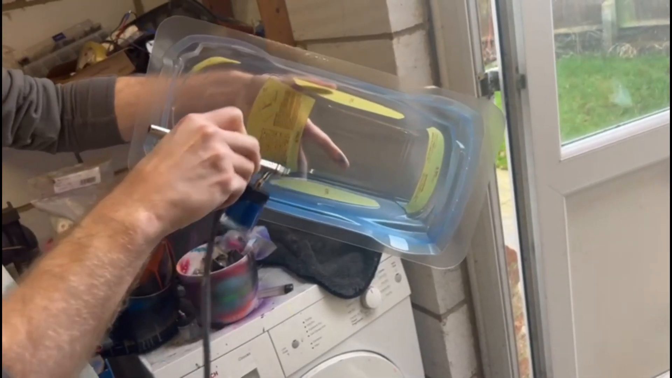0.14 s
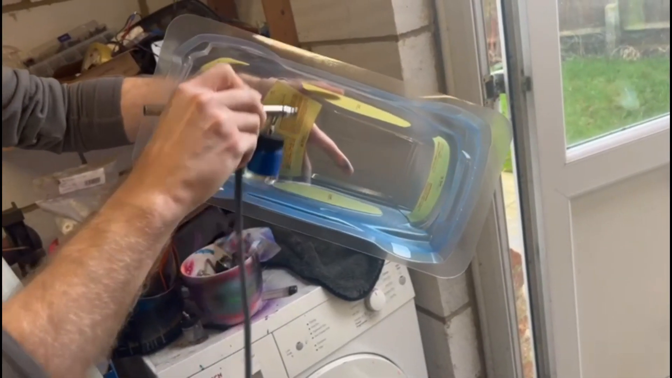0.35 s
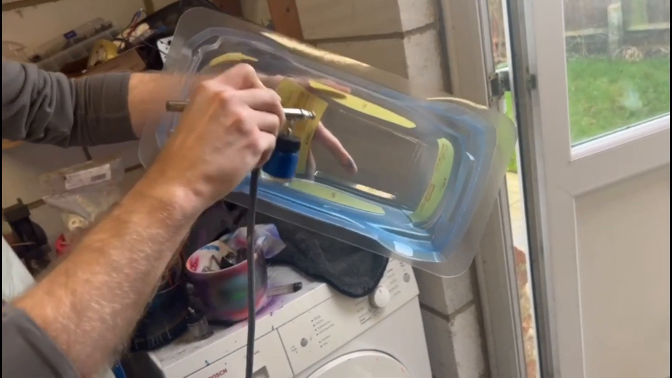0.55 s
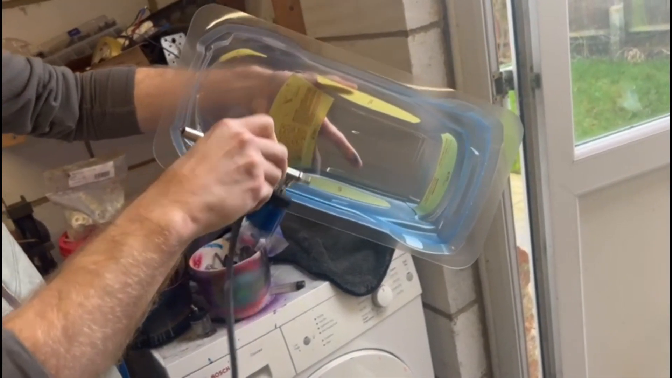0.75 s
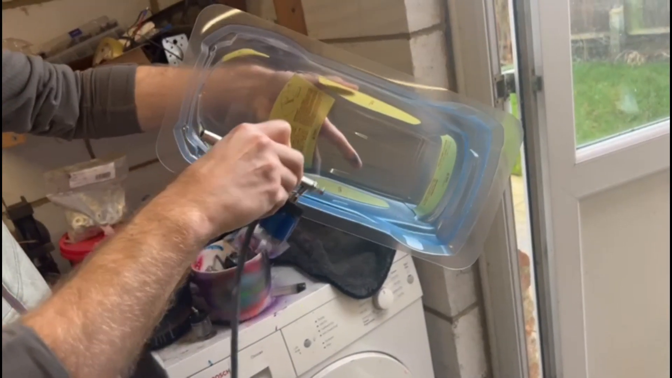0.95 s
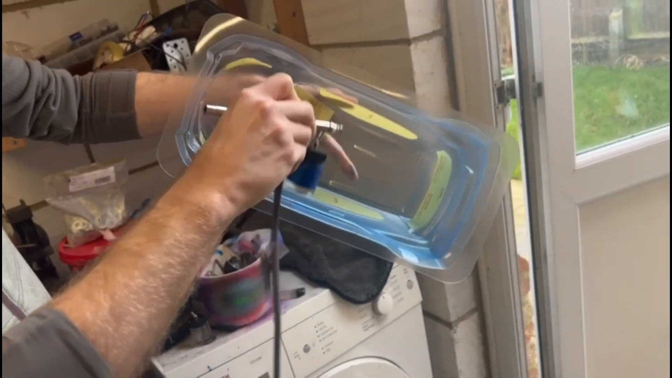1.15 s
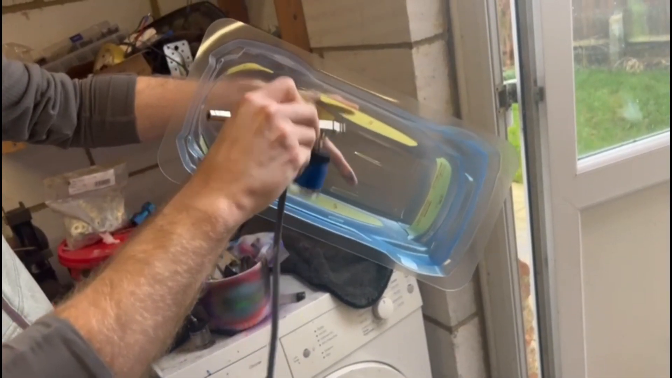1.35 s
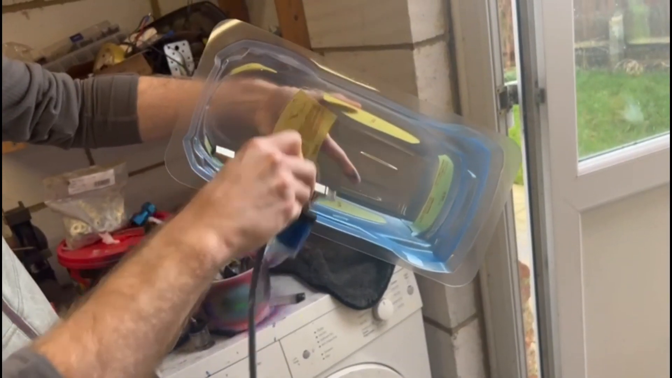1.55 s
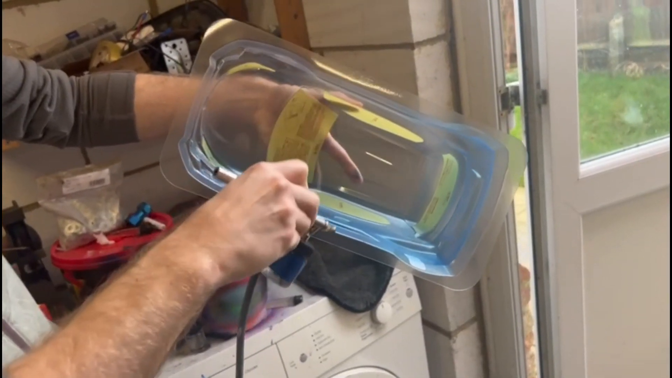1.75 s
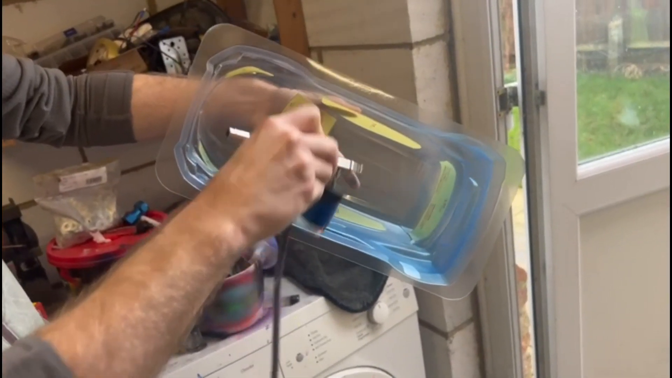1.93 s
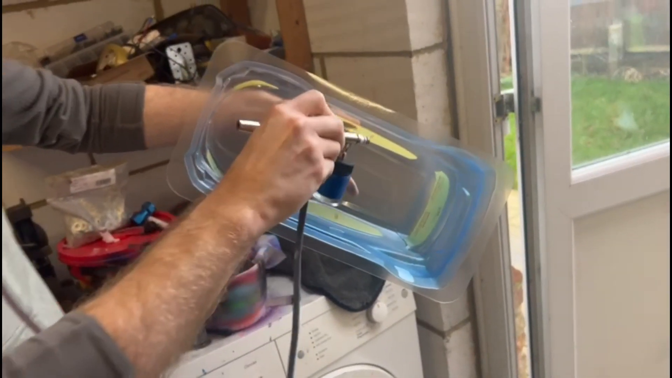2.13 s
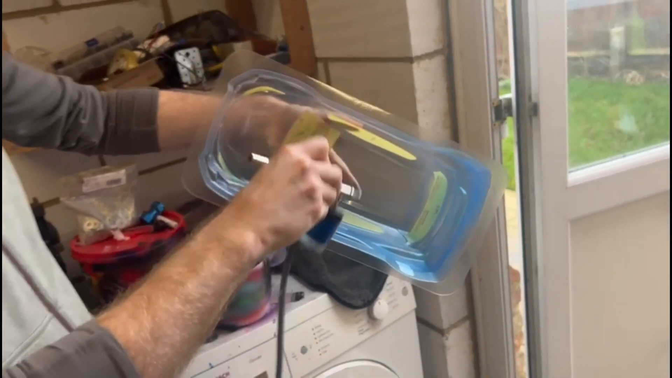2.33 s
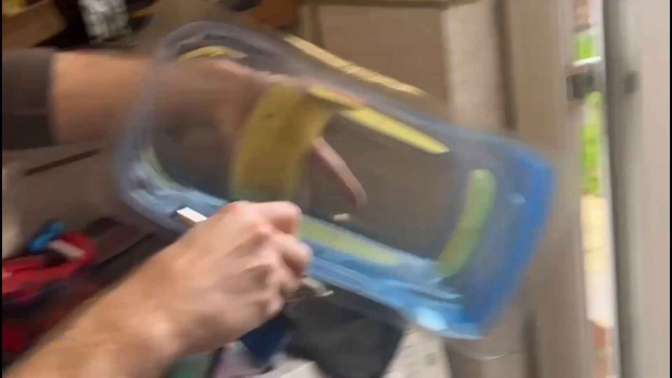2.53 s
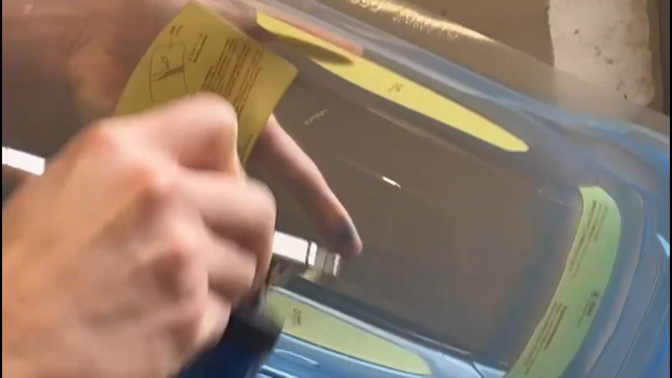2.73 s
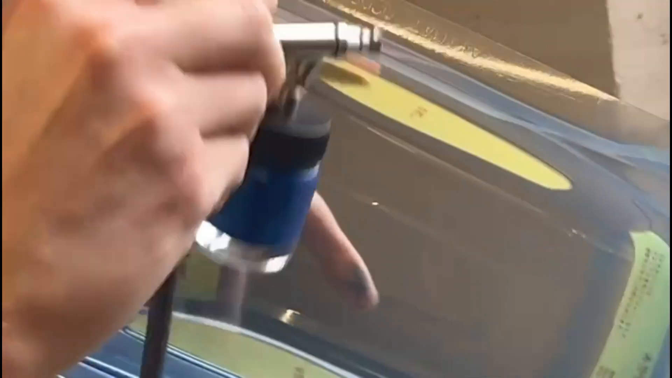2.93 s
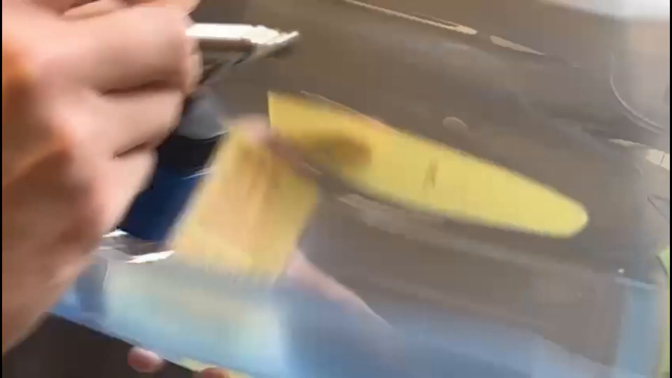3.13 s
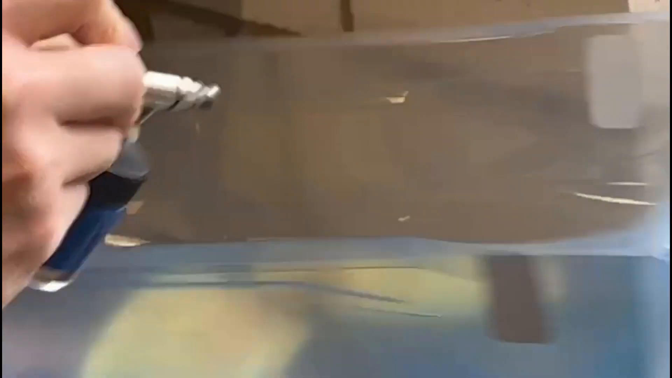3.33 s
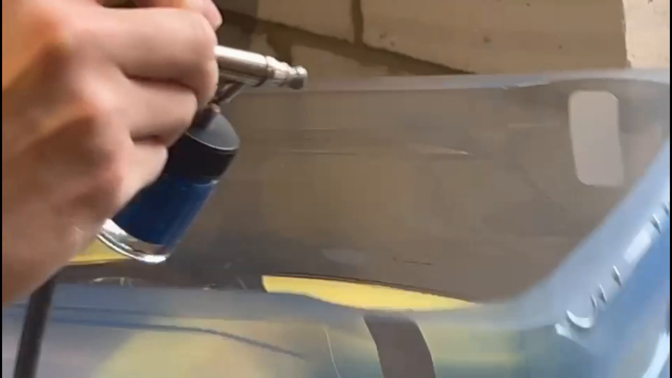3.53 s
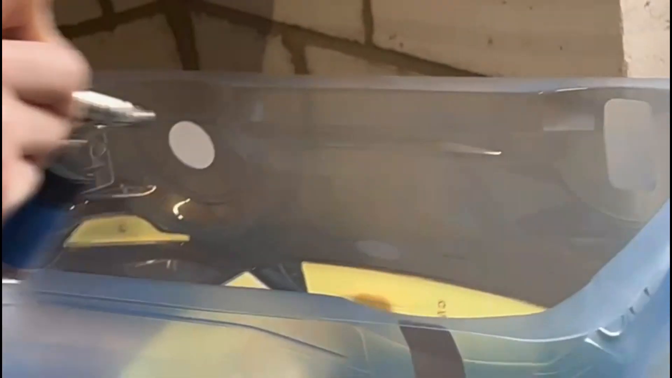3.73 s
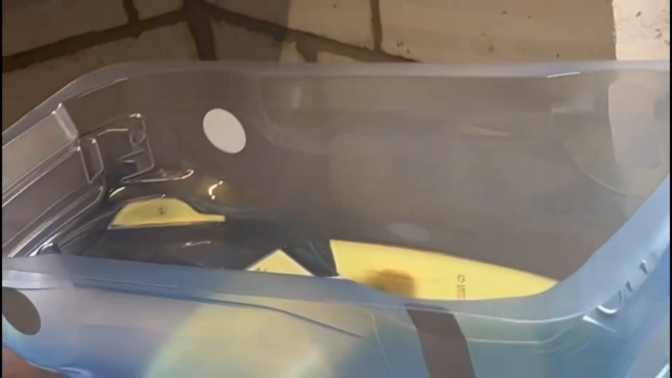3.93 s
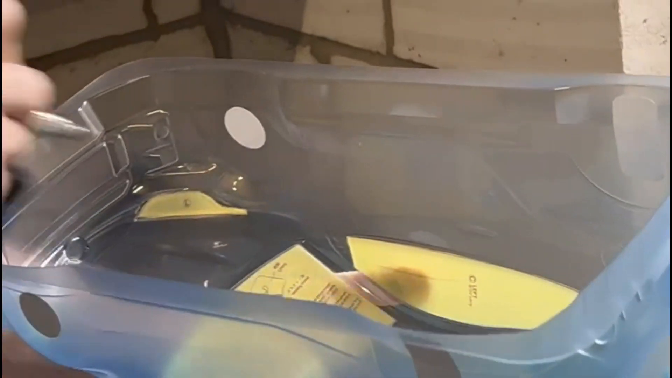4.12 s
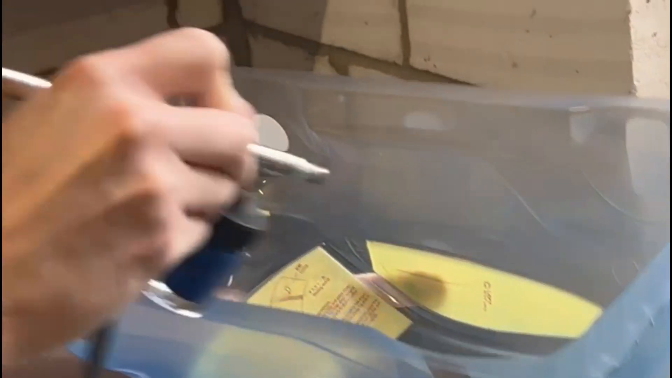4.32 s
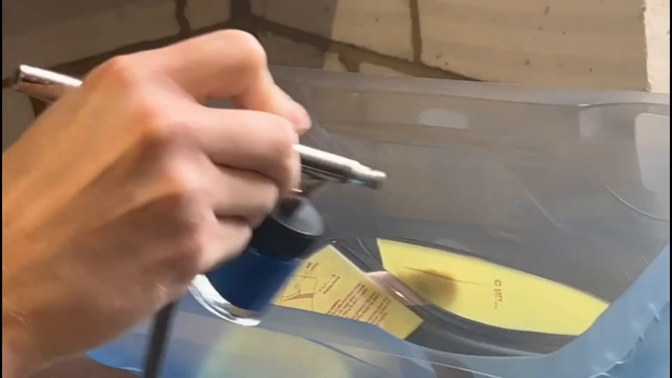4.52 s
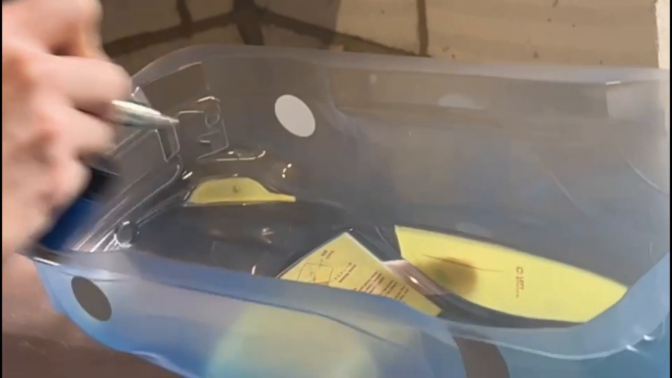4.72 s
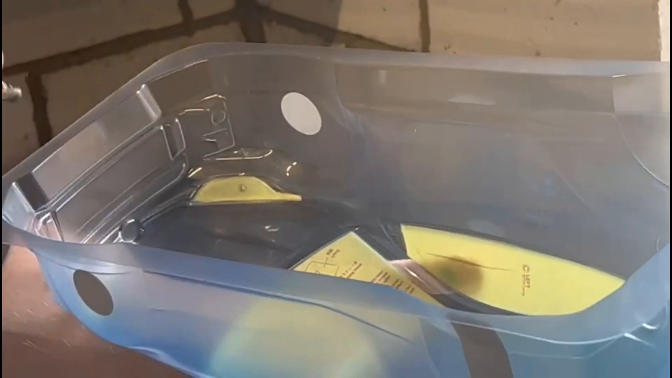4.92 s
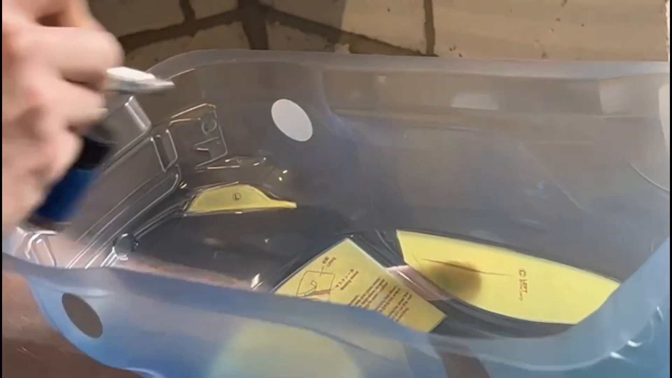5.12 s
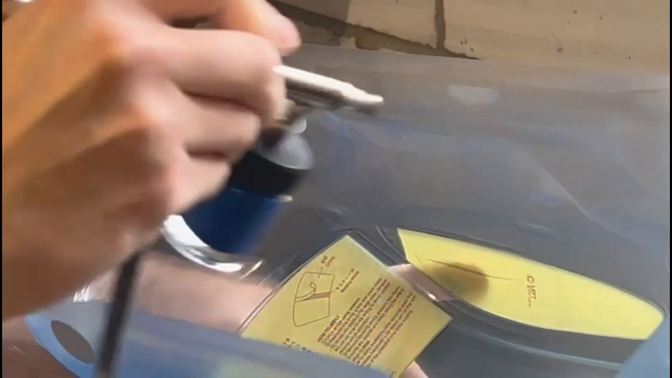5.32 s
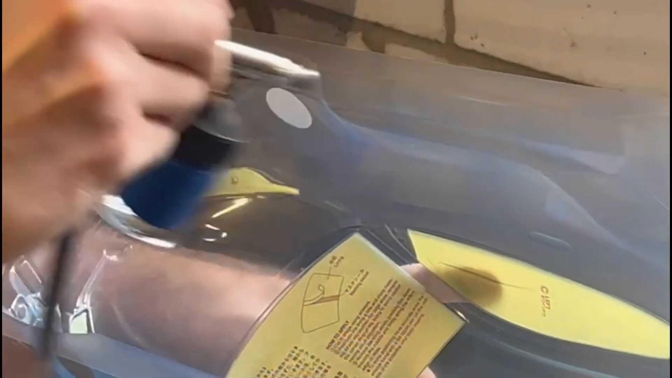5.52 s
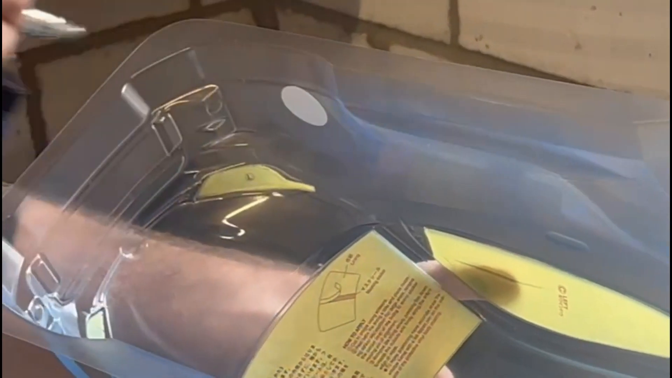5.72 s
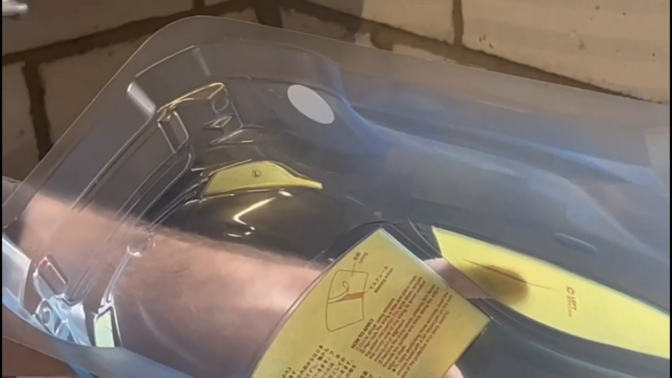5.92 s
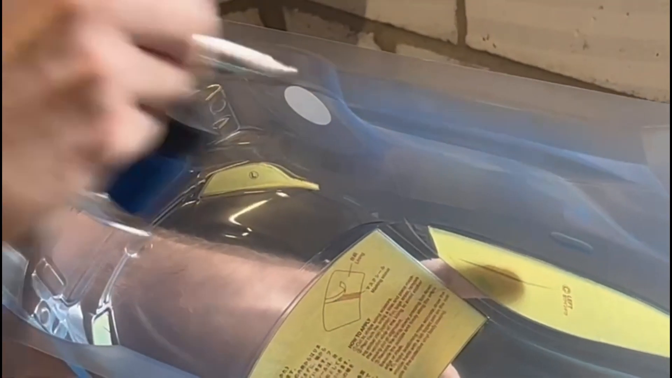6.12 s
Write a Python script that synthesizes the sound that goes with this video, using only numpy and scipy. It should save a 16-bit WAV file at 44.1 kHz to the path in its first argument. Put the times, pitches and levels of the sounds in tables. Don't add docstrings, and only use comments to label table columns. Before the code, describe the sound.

In a small workshop, an airbrush fires thirteen short airy hisses into a thin plastic shell, about two a second. Each snaps open, swells and shuts abruptly, with a splashing, slightly hollow colour and a short room tail. Around two and a half seconds the paint jar knocks the plastic once. Then the microphone is closer, the sound narrower and the strokes slightly softer. A low engine drones faintly outside.

```python
import sys
import numpy as np
from scipy import signal
from scipy.fft import rfft, irfft, next_fast_len
from scipy.io import wavfile
from scipy.ndimage import uniform_filter1d, map_coordinates

SR = 44100
rng = np.random.default_rng(int(sys.argv[2]) if len(sys.argv) > 2 else 0)


def elevation(decibels):
    levels = np.asarray(decibels, float)
    return 10 ** (levels / 20)


def pcm_store(signal):
    levels = np.round(np.clip(np.atleast_2d(signal), -1, 1) * 32767)
    wavfile.write(sys.argv[1], SR, levels.astype(np.int16).T)


N = 276059
CLOSER_S = 2.55

# opens [t/s], loudest [t/s], closes [t/s], hiss at the loudest [level/dB],
# softer at the start by [level/dB]
STROKES = [(0.094, 0.252, 0.41, -26.5, 7), (0.525, 0.644, 0.77, -25, 7), (0.905, 1.088, 1.249, -25.5, 10),
           (1.377, 1.492, 1.641, -27.5, 6), (1.772, 1.945, 2.075, -27, 7.5), (2.21, 2.36, 2.414, -24.5, 11),
           (2.6, 2.789, 2.901, -26, 10.5), (3.489, 3.81, 3.933, -28.5, 10.5), (4.077, 4.249, 4.415, -29, 4),
           (4.542, 4.661, 4.884, -28.5, 7.5), (5, 5.091, 5.346, -28.5, 2.5),
           (5.467, 5.64, 5.826, -28.5, 7.5), (5.993, 6.08, 6.262, -28.5, 3)]


def far_near(t, far, near):
    return np.where(t < CLOSER_S, far, near)


def unit(x):
    return x / np.sqrt(np.mean(x ** 2))


def along(points, hz, column=1):
    p = np.array(points, float)
    return np.interp(np.log(hz + 1e-9), np.log(p[:, 0]), p[:, column], left=p[0, column], right=p[-1, column])


def noise(points, channels=2):
    size = next_fast_len(N)
    hz = np.arange(size // 2 + 1) * SR / size
    gain = elevation(along(points, hz)) * (hz > points[0][0]) * (hz < points[-1][0])
    spectrum = rfft(rng.standard_normal((channels, size)))
    return unit(irfft(spectrum * gain, size)[:, :N])


def shape(x, gain_at):
    size = next_fast_len(N + 4096)
    hz = np.arange(size // 2 + 1) * SR / size
    return irfft(rfft(x, size) * gain_at(hz), size)[..., :N]


def walk(rate):
    hold = int(SR / rate)
    steps = np.repeat(rng.standard_normal(N // hold + 1), hold)
    return 1.3 * uniform_filter1d(uniform_filter1d(steps, hold), hold)[:N]


def ring_down(age, t60):
    return np.exp(-np.log(1000) * age / t60)


def trigger(t):
    # splash [level/dB], hollow [level/dB], low puff [level/dB],
    # spit at the start [level/dB], draught [level/dB]
    aim = [(-7, -12.5, -22, 8, -22), (-9.5, -13, -22, 1, -30.5), (-8.5, -10.5, -22, 21, -23),
           (-9.5, -14, -24, 7.5, -20.5), (-6.5, -11, -21.5, 9, -27), (-4, -9.5, -21, -0.5, -23),
           (-6.5, -16.5, -23.5, 11.5, -15), (-8.5, -17, -22, 5.5, -23), (-8, -15, -20, -2.5, -26.5),
           (-7.5, -15.5, -19.5, -6.5, -30.5), (-8, -16.5, -19, -3.5, -19.5), (-6.5, -14.5, -18, -4, -15),
           (-6, -13.5, -18.5, -2.5, -11.5)]
    opens, loudest, closes, top_db, start_db = np.transpose(STROKES)
    k = np.clip(np.searchsorted(opens, t) - 1, 0, None)
    age = t - opens[k]
    splash_db, hollow_db, puff_db, spit_db, draught_db = np.array(aim)[k].T

    before = np.clip((loudest[k] - t) / (loudest - opens)[k], 0, 1)
    after = np.clip((t - loudest[k]) / (closes - loudest)[k], 0, 1)
    swing_db = -start_db[k] * before ** 1.68 - far_near(t, 5.5, 4.5) * after ** 2.1

    attack_s, release_s, release_db = 0.0085, far_near(t, 0.034, 0.024), 15.5
    shut = np.clip((t - closes[k]) / release_s, 0, 1)
    valve = np.clip(age / attack_s, 0, 1) * (shut < 1)
    hiss_db = top_db[k] + swing_db - release_db * shut

    hollow_db = hollow_db + 0.38 * swing_db
    spit_s = 0.072
    puff_db = puff_db + spit_db * np.exp(-(np.clip(age, 0, None) / spit_s) ** 2)
    return valve, hiss_db, splash_db, hollow_db, puff_db, draught_db


def town(t):
    # [f/Hz], density [level/dB per Hz]
    rumble = [(18, -12.5), (30, -6), (55, 3), (110, -4.5), (200, -9), (380, -11), (1100, -11.5),
              (2000, -18.5), (4000, -30), (8500, -46.5), (9500, -75.5)]
    valve, hiss_db, *_, draught_db = trigger(t)
    draught = uniform_filter1d(valve * elevation(hiss_db + draught_db), size=2000)
    traffic = elevation(far_near(t, -50, -55.5) + 2.4 * walk(6))
    low = noise([(80, -7.0), (110, 0.5), (280, 1), (380, -15.0)])
    low = low * np.hypot(traffic, draught) * elevation(-2.5 + 2.4 * walk(10))
    return noise(rumble) * elevation(-53 + 1.3 * walk(3.13)) + low


def engine(t):
    # [t/s], firing rate [f/Hz], [level/dB]
    revs = [(0.0, 72.5, -61), (0.13, 73.4, -47), (0.449, 71.4, -50.5), (0.56, 62.26, -50),
            (0.92, 65.4, -50), (1.06, 71.7, -55), (1.24, 66.73, -48), (2.35, 74.1, -48.5), (2.7, 66.8, -50),
            (2.94, 88.05, -59), (3.05, 79.37, -53), (4.93, 85.2, -55), (5.27, 65.6, -53), (5.4, 69, -59),
            (5.739, 65.9, -50), (6.26, 72.3, -52)]
    s, *columns = np.transpose(revs)
    hz, db = (np.interp(t, s, c) for c in columns)
    pulling = (t > 2.95) & (t < 5.0)
    rough = np.where(pulling, 0.45, 1)
    phase = 2 * np.pi * np.cumsum(hz * (1 + 0.0344 * rough * walk(20))) / SR
    first_db = db - 0.53 * rough + 2.2 * rough * walk(20) + 2.6 * walk(38)
    second_db = db + np.where(pulling, -11, -13.5) + 1.3 * walk(11) + 2.5 * walk(4.3)
    return np.sqrt(2) * (elevation(first_db) * np.sin(phase) + elevation(second_db) * np.sin(2 * phase))


def earlier_stroke(t):
    fade = (0.0, 0.058, -44.5)
    start, decay, db = fade
    colour = [(400, 1), (2000, -13), (5000, -11), (8500, -1.5), (11500, -10.5)]
    return noise(colour) * elevation(db) * np.exp(-(t - start) / decay)


def knock(t):
    # [f/Hz], [level/dB], t60 [t/s], late by [t/s]
    modes = [
        (576, -19.5, 0.028, 0.0012),
        (1190, -29.5, 0.018, 0.0),
        (1600, -36, 0.024, 0.0045),
        (65.4, -25, 0.1, 0.0115),
    ]
    knock_s, rise_s = 2.4672, 0.00098
    out = np.zeros(N)
    for hz, db, t60, late in modes:
        age = np.clip(t - knock_s - late, 0, None)
        rise = 1 - np.exp(-age / rise_s)
        out += elevation(db) * rise * ring_down(age, t60) * np.sin(2 * np.pi * hz * age)
    return out


def room(x):
    # [f/Hz], t60 [t/s]
    room_t60 = [(300, 0.68), (2000, 0.35), (6000, 0.36), (12000, 0.22)]
    size = int(0.6 * SR)
    t = np.arange(size) / SR
    tail = 0
    for hz in 125 * 2 ** np.arange(8):
        edges = [hz / np.sqrt(2), min(hz * np.sqrt(2), SR * .49)]
        sos = signal.butter(2, edges, "band", fs=SR, output="sos")
        decay = ring_down(t, along(room_t60, hz)) * np.clip(t / 0.011, 0, 1)
        tail = tail + signal.sosfilt(sos, rng.standard_normal((2, size))) * decay
    tail /= np.sqrt(np.sum(tail ** 2, axis=1, keepdims=True))
    return signal.fftconvolve(x[None], tail, axes=1)[:, :N]


def shell(x):
    # delay [t/ms], wander [t/ms], gain [1]
    echoes = [
        (0.422, 0.05, 0.4),
        (1.151, 0.12, 0.33),
        (2.9, 0.3, 0.38),
    ]
    at = np.arange(N)
    mid, unlike = x[0].copy(), 0.41 * x[1]
    weight = far_near(at / SR, 1, 0.45)
    for k, (delay_ms, wander_ms, gain) in enumerate(echoes):
        lag = np.clip(delay_ms + wander_ms * walk(4), 0.05, 9) * SR / 1000
        echo = map_coordinates(x[0], [at - lag], order=3)
        mid += gain * weight * echo
        unlike += (-1) ** (k + 1) * 0.36 * echo
    echo_power = weight ** 2 * sum(gain ** 2 for _, _, gain in echoes)
    return np.array([mid / np.sqrt(1 + echo_power), unlike])


def jet(t):
    # [f/Hz], density [level/dB per Hz]
    nozzle = [(4500, -36.5), (5800, -5), (7000, -5), (8400, 0), (9400, -0.5), (10200, -2), (11200, -3.5),
              (11900, -16.5), (13000, -26), (15000, -19.5), (16000, -34), (16900, -44)]
    splash = [(2500, -20), (3000, -3), (3800, -4.5), (4700, -2.5), (5500, -2.5), (6200, -18.5)]
    hollow = [(1000, -17.5), (1300, -6.5), (1650, -6), (2100, -2.5), (2400, -3), (2750, -4), (3200, -11.5)]
    puff = [(120, -22), (250, -6), (360, -3.5), (480, 5.5), (800, -1.5), (1200, -2.5), (1700, -10.5)]
    valve, hiss_db, splash_db, hollow_db, puff_db, _ = trigger(t)
    eddy_db = 0.88 * walk(24.95)
    out = noise(nozzle) * elevation(3.0 + 0.62 * walk(150) + 0.79 * walk(40))
    out += noise(splash) * elevation(splash_db + 1.14 * walk(30) + 1.2 * walk(9))
    out += noise(hollow) * elevation(hollow_db + 2.0 + 1.05 * walk(18) + 0.95 * walk(8))
    out += noise(puff) * elevation(puff_db + 1.4 + 1.23 * walk(30) + 2.46 * walk(9))
    return out * uniform_filter1d(valve, size=90) * elevation(hiss_db + eddy_db)


def two_ports(t, mid, unlike):
    # [f/Hz], left leads by [half turns]
    port_phase = [(600, 0.0), (1300, -0.15), (2800, 0.18), (4700, 0.05), (8600, 0.05), (9000, 0.5),
                  (9600, 0.72), (10100, 1.0), (11000, 1.4), (11500, 1.85), (12700, 2.1), (13200, 2.6),
                  (14300, 3.05), (15000, 3.55), (16000, 4.0)]
    # [f/Hz], side far [level/dB], side near [level/dB]
    width = [(59.4, -15.5, -19), (200, -14, -17.5), (700, -6, -6.5), (1300, -6, -5), (2400, -2.5, -14),
             (4360, 1.5, -16), (8500, -4.5, -16.5), (9100, -27, -27.5)]

    def lead(hz):
        return np.exp(.5j * np.pi * along(port_phase, hz))

    far = t < CLOSER_S
    side = shape(unlike * far, lambda hz: elevation(along(width, hz, column=1)))
    side = side + shape(unlike * ~far, lambda hz: elevation(along(width, hz, column=2)))
    left = shape(mid, lead) + side
    right = shape(mid, lambda hz: np.conj(lead(hz))) - side
    pan_db = 0.2 * far
    return np.array([left * elevation(pan_db / 2), right * elevation(-pan_db / 2)])


def scene():
    t = np.arange(N) / SR
    spray, tap = shell(jet(t)), knock(t)
    tail = elevation(-16) * room(spray[0] + 0.33 * tap)
    mid, unlike = spray + tail + earlier_stroke(t) + town(t)
    tap_pan = elevation(np.array([[-1.5], [1.5]]))
    return two_ports(t, mid, unlike) + tap * tap_pan + engine(t)


def thin_out(dry):
    # from [f/Hz], mid far [1], mid near [1], side far [1], side near [1]
    emptied = [(0, 0, 0, .1, .4), (300, 0, 0, .1, .62), (2000, .07, .01, .35, .97),
               (3400, .11, .03, .38, .99), (4600, .05, .03, .5, .995), (6900, .04, .025, .3, .995),
               (8300, 0, .01, .3, .97), (8900, 0, .04, .03, .03), (9650, .96, .88, 0, 0),
               (10550, .6, .66, .05, .05), (11150, .42, .38, .93, .95), (11900, .84, .3, 1, 1),
               (12900, .7, .15, .3, .3), (13500, 1, .97, .05, .03), (14550, .92, .88, .15, .15),
               (15050, .8, .55, .97, .97), (15750, 1, 1, 1, 1)]
    mid_side = np.array([dry[0] + dry[1], dry[0] - dry[1]]) / 2
    hz, s, z = signal.stft(mid_side, SR, nperseg=1024)
    table = np.array(emptied)[np.searchsorted(np.array(emptied)[:, 0], hz, side="right") - 1]
    share = np.array([far_near(s, table[:, [k]], table[:, [k + 1]]) for k in (1, 3)])

    band = np.unique(np.floor(11 * np.log(1 + hz / 900) + hz / 900), return_inverse=True)[1]
    bands = band.max() + 1
    draws = np.repeat(rng.standard_normal((2, bands, len(s))), 2, axis=2)[..., :len(s)]
    chance = uniform_filter1d(draws, size=5) / np.sqrt(2)

    power = np.add.reduceat(np.abs(z) ** 2, np.searchsorted(band, np.arange(bands)), axis=1)
    relief = np.log(power + 1e-14)
    chance += 0.25 * uniform_filter1d(relief - uniform_filter1d(relief, size=7, axis=1), size=5)
    rank = chance.argsort().argsort() / len(s)

    opens, _, closes, *_ = np.transpose(STROKES)
    attack = np.abs(s[:, None] - opens).min(axis=1) < 0.009
    closing = np.abs(s[:, None] - closes - 0.012).min(axis=1) < 0.012
    shutting = closing & (hz[:, None] < 13500)
    relax = np.where(shutting, np.array([.5, .88])[:, None, None], 1)
    keep = (rank[:, band] >= share * relax) | attack
    mid, side = signal.istft(z * keep, SR, nperseg=1024)[1][:, :N]
    return np.array([mid + side, mid - side])


def band_limit(x):
    return signal.sosfilt(signal.butter(12, 16820, fs=SR, output="sos"), x)


def record(dry):
    return band_limit(thin_out(dry))


dry = scene()
out = record(dry)
pcm_store(out)
```